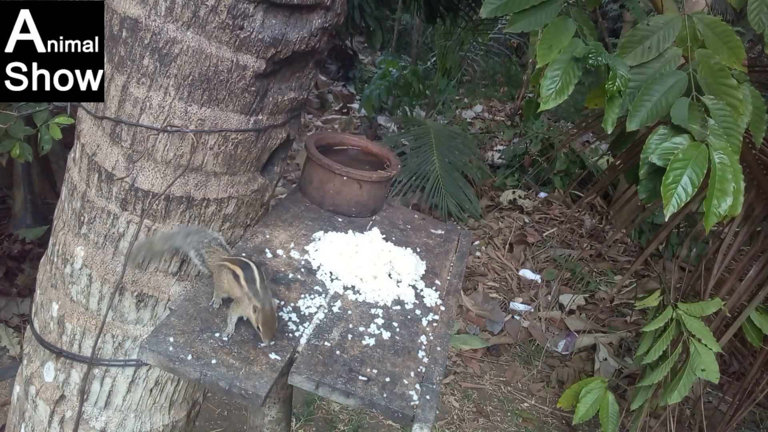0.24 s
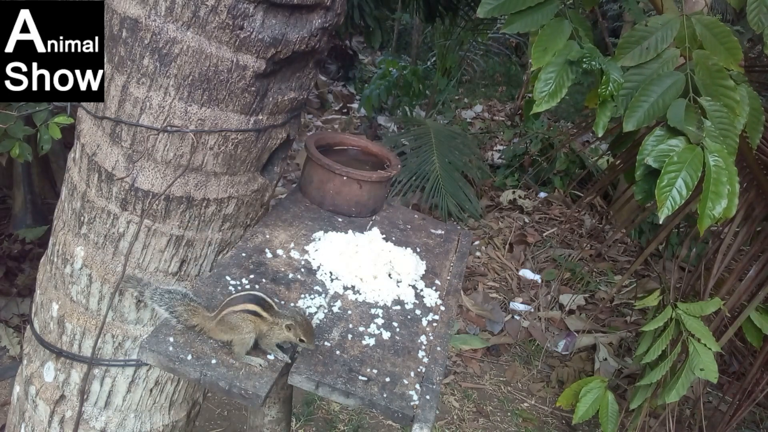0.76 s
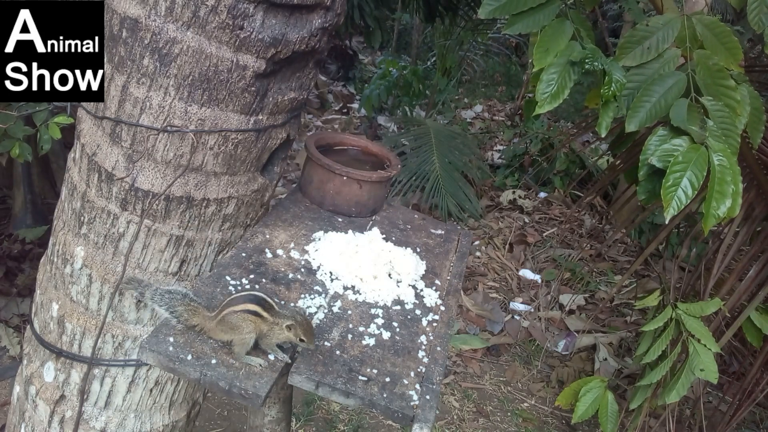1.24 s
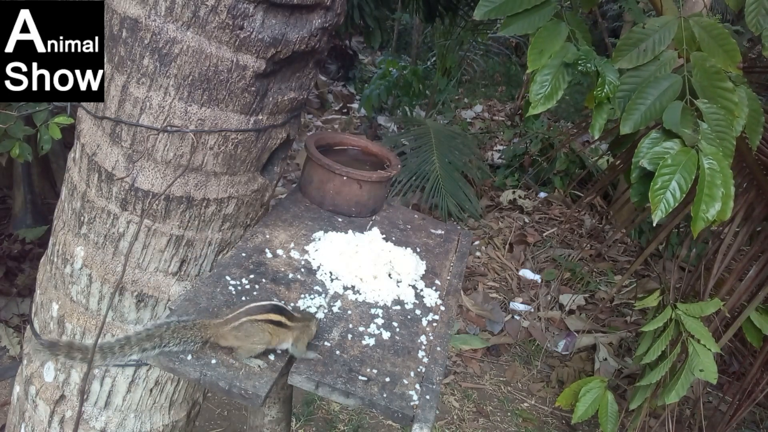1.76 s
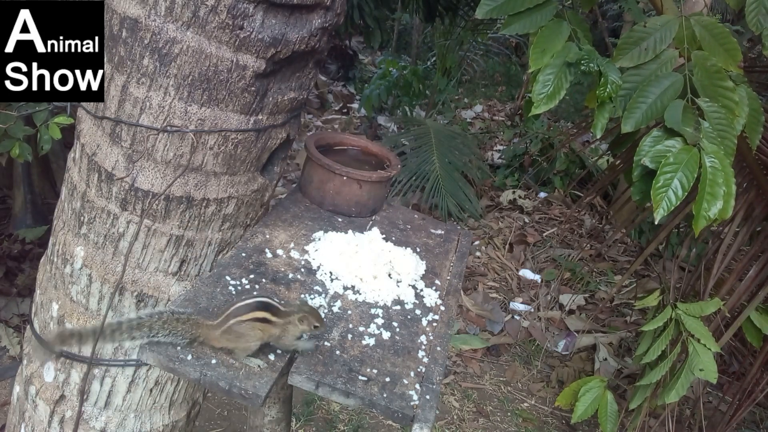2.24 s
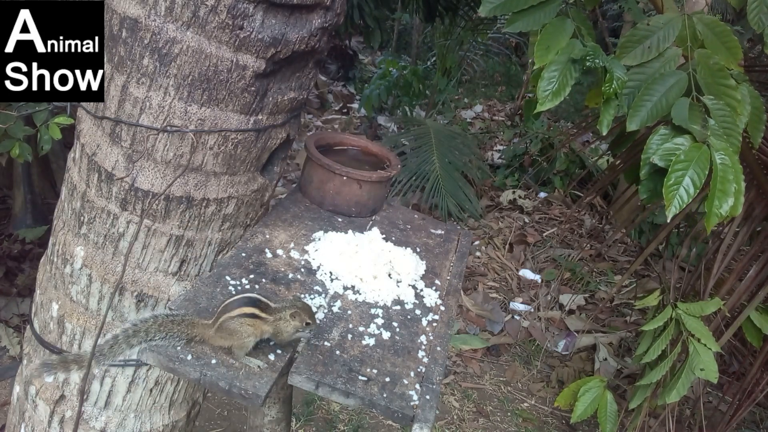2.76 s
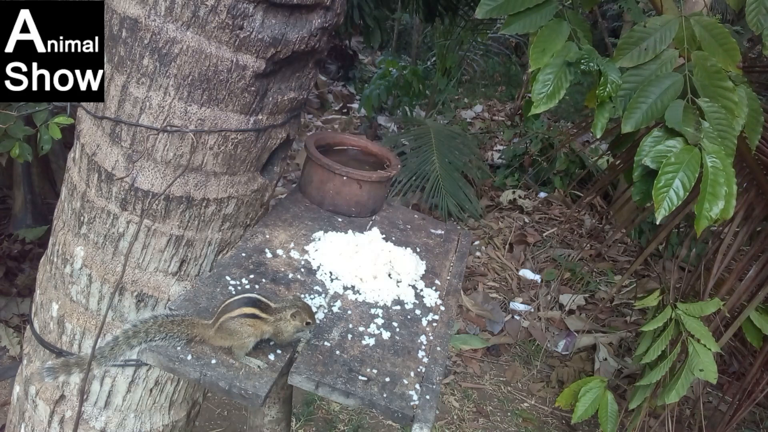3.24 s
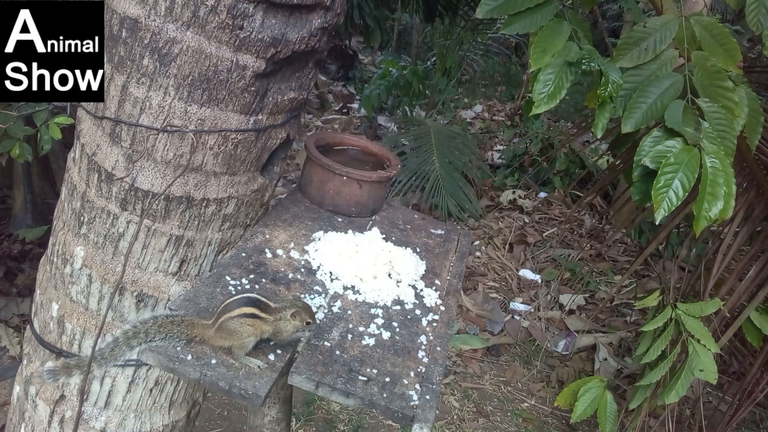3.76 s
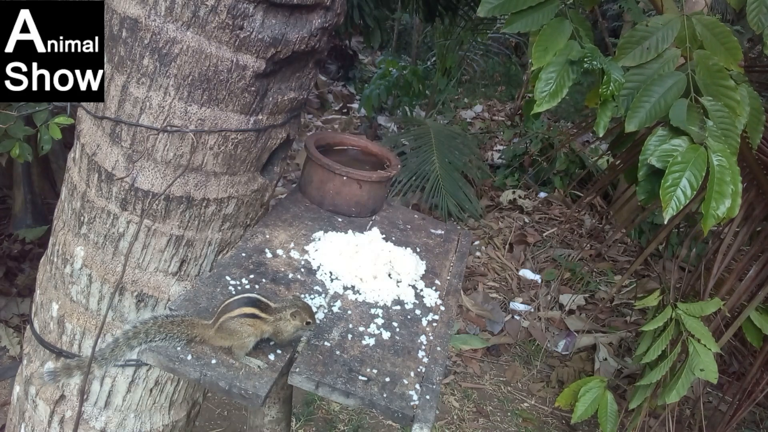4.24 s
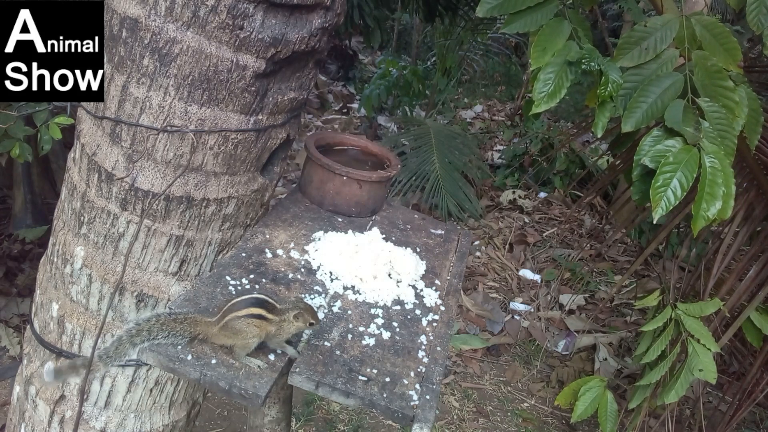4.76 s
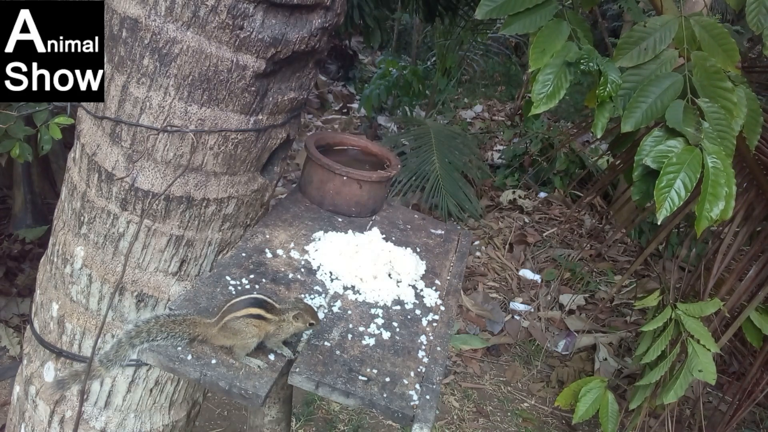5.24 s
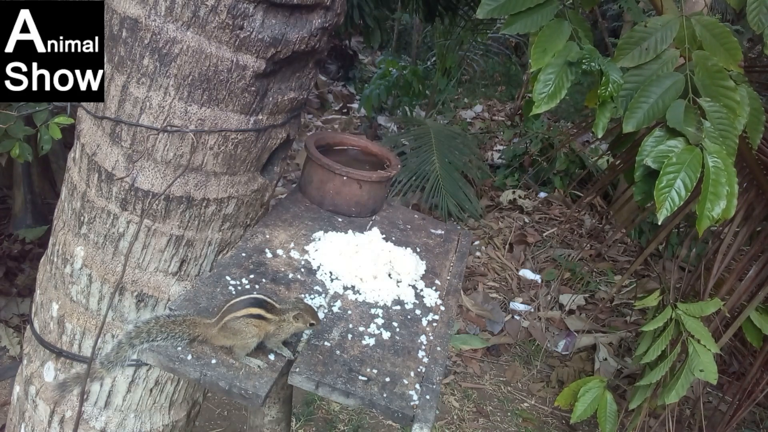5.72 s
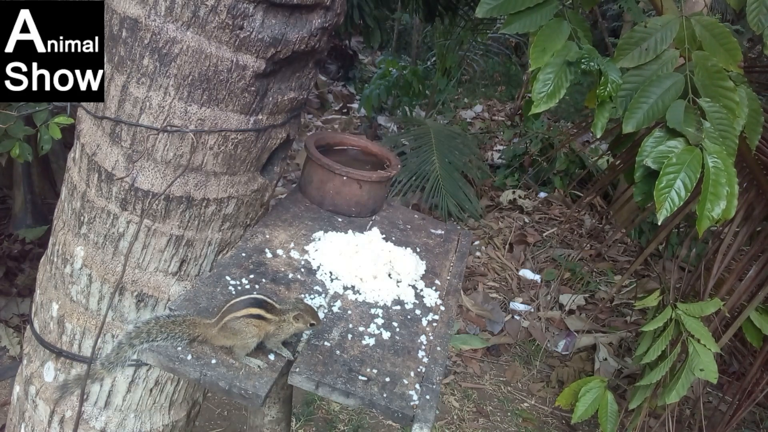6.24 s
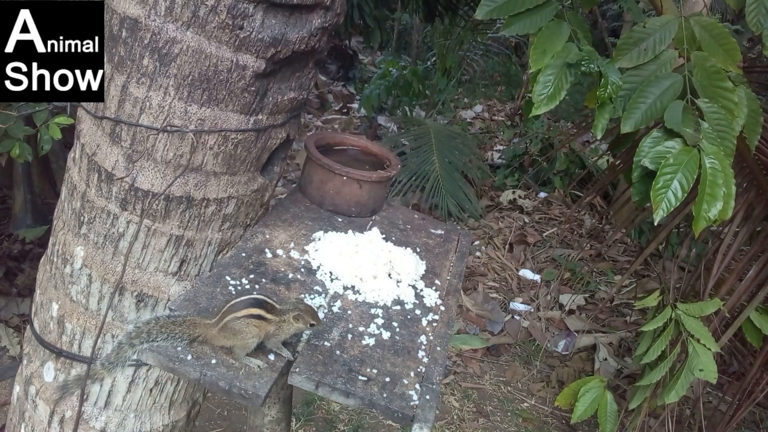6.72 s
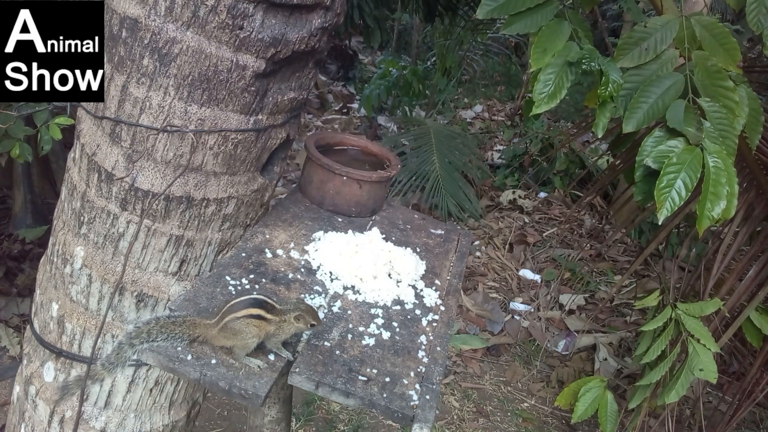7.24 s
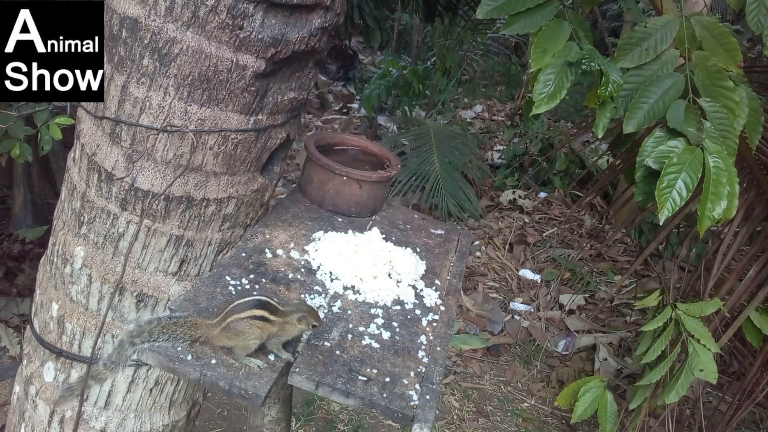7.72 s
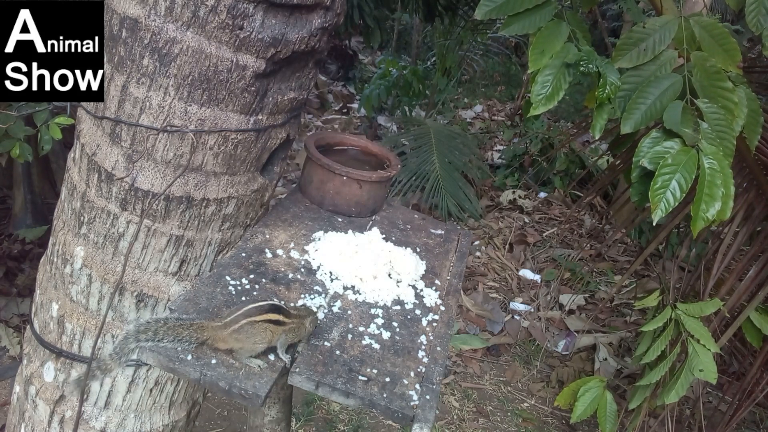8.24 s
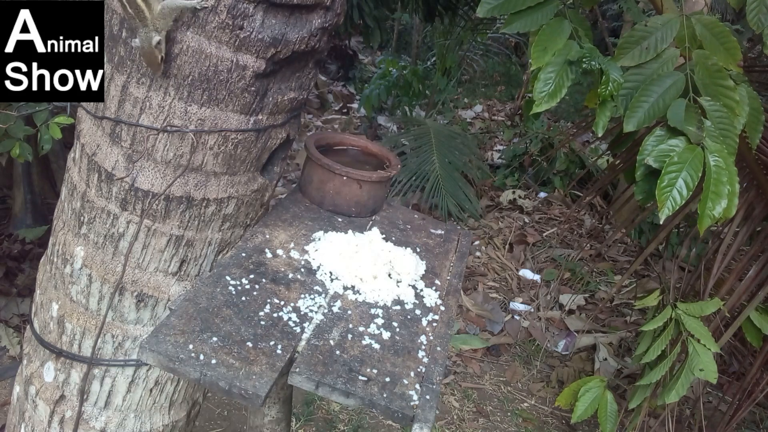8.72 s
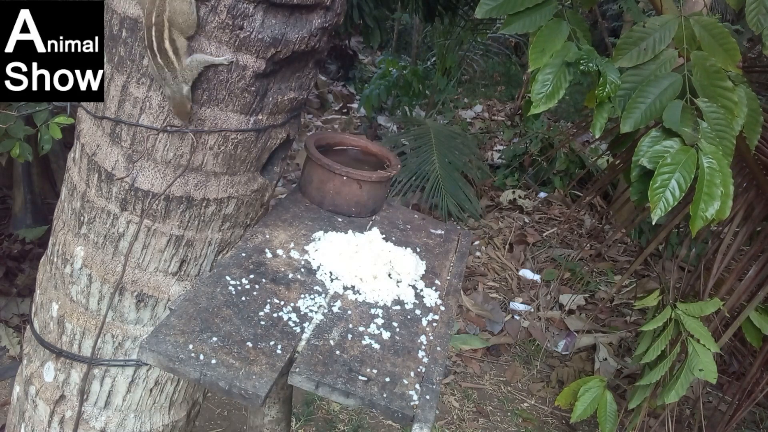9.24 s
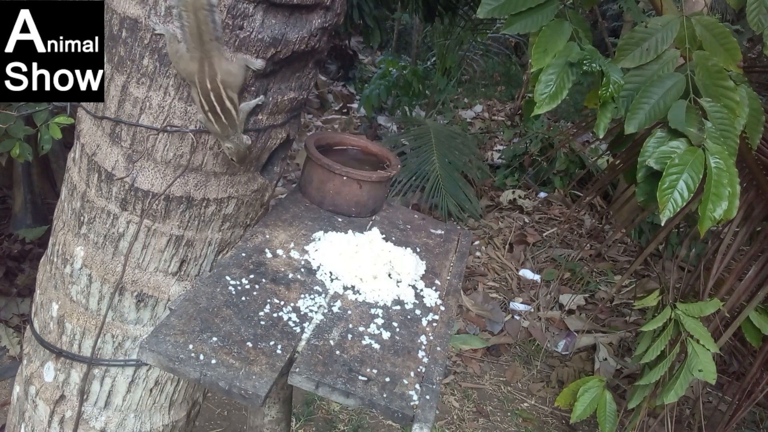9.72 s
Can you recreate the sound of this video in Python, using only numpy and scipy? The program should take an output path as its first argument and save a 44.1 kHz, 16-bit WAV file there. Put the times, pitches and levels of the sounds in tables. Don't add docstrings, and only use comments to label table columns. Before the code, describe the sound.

A small squirrel gives sharp, echoing high chirps in a garden while a sheet-metal gate rattles and bangs over faint birds and traffic rumble.

```python
import sys
import numpy as np
from scipy import signal
from scipy.fft import rfft, irfft, next_fast_len
from scipy.io import wavfile
from scipy.ndimage import uniform_filter1d, map_coordinates

SR = 44100
rng = np.random.default_rng(int(sys.argv[2]) if len(sys.argv) > 2 else 0)


def materialize(psi):
    bounded = np.clip(np.atleast_2d(psi).T, -1, 1)
    quanta = np.round(bounded * 32767).astype(np.int16)
    wavfile.write(sys.argv[1], SR, quanta)


def boost(x):
    u = np.asarray(x, float) / 20
    return 10 ** u


N = 440118

# [t/s, peak level/dB, held f/Hz, hold/s, strain/dB]
CHIRPS = [(0.079, -30.5, 2360, 0.015, 0.5), (0.259, -16.5, 2553, 0.026, -14),
          (3.991, -31, 2195, 0.017, -2.5), (4.317, -34.5, 2116, 0.0228, 0.5),
          (4.614, -18.5, 2590, 0.013, -12), (6.012, -30, 2554, 0.017, -8.5), (6.277, -20, 2548, 0.011, -8),
          (6.668, -26, 2600, 0.014, -3), (6.88, -20.5, 2555, 0.012, -6), (7.141, -22.5, 2584, 0.014, -2),
          (7.346, -29.5, 2493, 0.01, -0.5), (7.464, -29, 2518, 0.014, -0.5),
          (7.579, -25, 2484, 0.019, -2.5), (7.747, -26, 2512, 0.013, 0), (8.001, -29, 2484, 0.011, -0.5),
          (8.195, -35, 2442, 0.0094, 0), (8.397, -33, 2447, 0.01, -1.5)]
# [octave level/dB, closing slide level/dB, rasp level/dB, climb/share of pitch]
CHIRP_MOUTHS = [(-3, 0, -24, .12), (-2.5, 0, -32, .3), (2.5, -5, -9, .2), (4.5, -5, -8, 0.13),
                (1, 1.5, -25, .45), (2.5, -3, -19.5, 0.27), (4, -3.5, -21, .15), (0, -3.5, -20, 0.105),
                (-4, -0.5, -24, 0.134), (2, -2.5, -25, 0.139), (0, -1, -19, 0.096), (0, 0, -20, 0.099),
                (-3, 2, -20, 0.094), (-0.5, -2, -24, 0.097), (-2, -1, -21, 0.102), (-1, 1, -21.5, .1),
                (-1, 0.5, -22.5, 0.101)]
# [t/s, peak level/dB, held f/Hz, hold/s, strain/dB]
YELPS = [
    (6.383, -39, 2194, 0.017, -1.1),
    (6.533, -38.5, 2353, 0.0204, -1.2),
]
# [octave level/dB, closing slide level/dB, rasp level/dB, climb/share of pitch]
YELP_MOUTHS = [(-2, -2, -9.5, 0.102), (0.5, -1.8, -10, 0.101)]
# [t/s, level/dB, f/Hz, length/s, glide/share of pitch]
SQUEAKS = [
    (0.245, -43, 2830, 0.013, 0.24),
    (3.972, -33.5, 2760, 0.02, 0.22),
    (4.315, -30, 2900, 0.015, 0.24),
    (4.6, -44, 2730, .012, 0.21),
    (6.0, -46, 2700, 0.009, 0.26),
    (6.26, -40, 2640, 0.014, 0.22),
    (3.997, -34.5, 3160, 0.0235, -0.118),
    (4.333, -34, 3070, 0.023, -0.146),
    (4.625, -39, 3030, .012, -.12),
]
# [f/Hz, level/dB]
THROAT = [(1500, -35), (2100, 8.5), (2600, 1.5), (4200, -9.5), (5100, -6), (6200, 0), (7600, -11.5),
          (10000, -22), (12600, -9), (15500, -32)]
# [f/Hz, level/dB per Hz]
THROAT_AIR = [(1200, -40), (2000, 0), (3200, -6), (5500, 0.5), (7500, -8.5), (10000, -13.5), (13500, -6),
              (15700, -11.5)]

# [t/s, rms level/dB, decay stretch/ratio, brightening/dB per octave, up to f/Hz]
GATE_BLOWS = [(4.015, -47, 1.2, 10, 298), (4.116, -51, 0.8, 6.5, 3140), (4.154, -43.5, 1.9, 5.5, 2730),
              (4.218, -37.5, 0.83, 4.5, 625), (4.225, -42, 0.46, 3, 11100), (4.857, -39.5, 1.23, 5.5, 9000),
              (4.86, -59, 1, 6, 8900), (4.868, -28.5, 1.7, 1.5, 274), (4.95, -33, 3, 0.4, 1030),
              (5.427, -29, 0.56, 2, 1200), (5.427, -53, 0.26, 12, 15000), (5.438, -47, 0.55, 14.5, 9100),
              (5.446, -42.5, 0.82, 6, 7500), (5.47, -31.5, 0.89, 3, 5030)]
# [f/Hz, level/dB per Hz]
BLOW_SPECTRUM = [(25, -60), (40, -37), (65, -10), (100, -9), (168, -15), (270, -14.5), (330, -24),
                 (800, -26.5), (1500, -36.5), (3800, -45), (8000, -59), (15500, -75)]
# [f/Hz, width/Hz, level/dB]
PANEL_MODES = [(63.8, 4.3, 4), (94, 18, 3), (122, 13, 6.5), (213, 20, 4.5), (269, 12.6, 7), (413, 16, 7.5),
               (490, 20, 5), (653, 16, 6), (802, 10.5, 12), (1052, 24, 7.5)]
# [f/Hz, t60/s]
PANEL_DECAY = [(60, 2.05), (120, 0.76), (250, 0.88), (1000, 0.8), (4000, 0.61), (12000, 0.97)]
# [f/Hz, level/dB, t60/s]
BOLT_MODES = [(2419, -3, .52), (3962, -3, .23), (4775, 0, 0.26), (5163, 4, .3), (5771, -3, 0.55),
              (6800, 4.5, 0.63), (7460, 2, 0.56), (7610, 0, 0.35), (9800, 9, 0.12), (11050, 5, .2),
              (12480, -1, 0.43), (13010, 1, .25), (13300, -6, .3), (15400, -6, .2)]
HASP_MODES = [(1290, 3.5, 0.38), (2900, 0, 0.59), (5300, -5, .35), (7400, -11, .3)]
LATCH_MODES = [(2900, -3, .007), (3400, -3, .008), (3850, -2, .01), (4500, -8, .006), (5700, -4, .01),
               (6800, -9, .006), (8800, -12, .006), (13600, -19, .005)]
# [t/s, level/dB]
BOLT_STRIKES = [
    (5.436, -49.5),
    (5.448, -53),
    (5.47, -51.5),
]
HASP_JUMPS = [
    (4.118, -57),
    (4.156, -53),
    (4.22, -56),
]
LATCH_CLICKS = [
    (4.8578, -24.5),
    (4.8612, -38),
]

# [t/s, peak level/dB, f/Hz]
SNAPS = [(0.1996, -26.5, 2550), (.305, -39, 750), (2.518, -44.5, 2630), (2.715, -43, 1160),
         (3.462, -45.5, 550), (3.584, -43.5, 690), (4.2203, -21, 625), (5.432, -25, 500),
         (6.31, -37.5, 810), (6.44, -37, 840), (6.833, -32.5, 1530), (6.867, -34, 1500),
         (6.95, -29.5, 1800), (7.525, -40, 755), (7.63, -41, 750), (9.256, -45, 1510),
         (9.33, -37, 1280), (9.409, -36.5, 1610), (9.428, -43, 2130)]
# [f/Hz, level/dB per Hz]
LEAF_SPECTRA = [
    [(1180, -49), (2000, -17), (2290, -7.5), (2870, -13), (3460, -8), (7480, -10.5), (15500, -18)],
    [(530, -23), (900, -3.5), (2100, 0.5), (2510, 5), (3300, -11.5), (7060, 1), (15500, -16.5)],
]
LEAF_SWEEPS = [
    (1.094, -76, .15, .1),
    (1.49, -72, .06, .12),
    (2.94, -72, .04, .6),
    (3.03, -76, .4, .15),
    (3.158, -70, .15, .15),
    (3.296, -79, .03, .05),
]
LEAF_SCUFFLES = [
    (6.846, -55, 0.11, 0.092),
    (6.9, -57.5, 0.044, 0.31),
    (7.006, -74, 0.038, 0.71),
    (8.606, -71, 0.054, .04),
    (8.723, -66, 0.019, 0.22),
    (8.969, -89, 0.27, .08),
    (9.2, -93, 0.008, 0.017),
    (9.338, -61, .2, 0.1),
    (9.428, -67, 0.053, 0.041),
]

# [t/s, length/s, from f/Hz, to f/Hz, level/dB]
BIRD_NOTES = [(0.528, 0.098, 2020, 2185, -69), (0.597, 0.048, 2530, 2225, -63.5),
              (0.637, 0.087, 2400, 2540, -71), (1.562, 0.21, 2047, 2140, -71.5),
              (1.741, 0.18, 2130, 2400, -66), (1.87, 0.1, 2290, 2067, -66), (2.659, 0.27, 1935, 2437, -70),
              (2.92, 0.066, 2380, 2120, -69), (8.6, 0.19, 2527, 2440, -67.5),
              (8.69, .11, 2290, 2135, -68.5), (9.619, 0.24, 1850, 2114, -76),
              (9.846, 0.18, 2324, 2530, -68.5), (3.588, 0.11, 2350, 2470, -75),
              (8.84, 0.11, 2900, 2830, -72.5), (2.0, 0.43, 2150, 2240, -81.5),
              (9.24, 0.13, 2520, 2220, -70)]
# [t/s, length/s, from f/Hz, to f/Hz, level/dB]
THIN_WHISTLES = [(2.06, .2, 4900, 4780, -77), (9.41, .13, 4750, 4550, -76), (3.49, .075, 4400, 4850, -70),
                 (3.56, .3, 4850, 4800, -78), (3.6, .04, 4800, 3600, -65), (3.8, .09, 6300, 4950, -73),
                 (1.56, .22, 4100, 4300, -75), (1.75, .15, 4800, 4850, -76), (1.9, .07, 4350, 4100, -72),
                 (2.58, .27, 3760, 4400, -73), (1.25, .13, 3400, 3350, -76), (9.62, .25, 3750, 4200, -75),
                 (.47, .11, 4250, 4250, -75), (3.83, .14, 3620, 3820, -78), (1.76, .1, 2700, 2680, -75)]
MOTOR_SWELLS = [
    (1.53, -58.5, .65, 0.56),
    (2.0, -61.5, 0.2, 0.38),
    (2.62, -56.5, 0.19, 0.62),
    (3.22, -63, 0.17, 0.062),
]

TRAFFIC_SWELLS = [
    (.41, -62, 1, 0.78),
    (1.3, -64, 0.32, 3.3),
    (2.41, -61, 3.2, 0.32),
    (3.28, -60, 0.73, 0.73),
    (3.95, -64, 2, 3.5),
    (6.42, -49, 0.15, 0.27),
    (7.7, -73, 2, 2.3),
    (8.9, -53, 0.65, 2),
    (9.6, -59, 1.8, 6.4),
]
DRONE_SWELLS = [
    (.41, -61, 1.9, .6),
    (1.4, -58, 0.89, 6),
    (2.66, -74, 0.43, 3.3),
    (3.25, -76, 1.4, 0.074),
    (3.95, -66, 0.44, 3.9),
    (6.42, -63, 1.4, 0.28),
    (7.05, -67, 1.1, 0.3),
    (7.55, -54, 0.24, 0.34),
    (8.32, -60, 1.9, 0.98),
    (9.14, -59, 0.72, 3.6),
]
# [f/Hz, level/dB per Hz]
TRAFFIC_SPECTRUM = [(25, -18), (42, 0), (65, 6.5), (100, -9.5), (160, -10), (300, -60)]
DRONE_SPECTRUM = [(400, -18.5), (560, -2.5), (670, -0.5), (760, -2.5), (950, -29)]
INSECT_SPECTRUM = [(5400, -35), (6200, -6.5), (6900, 2.5), (7400, -5), (8000, -27)]
GARDEN_SPECTRUM = [(15, -45), (25, -7), (64, -0.5), (126, -6.5), (178, -12), (275, -8), (446, -14),
                   (668, -14.5), (1180, -21), (1580, -22.5), (2860, -25.5), (3450, -25.5), (3840, -28),
                   (6950, -31), (15600, -46)]
# [t/s, level/dB]
GARDEN_LEVEL = [
    (0, -71.5),
    (3.4, -74),
    (4, -69.5),
    (6.4, -66),
    (8, -67.5),
    (8.8, -69.5),
    (9.98, -69.5),
]

# [delay t/s, level/dB]
WALL_ECHOES = [(0, -30), (.003, -2), (.012, 1), (.03, 1), (.05, -2), (.08, -5), (.11, -6), (1, -6)]
# [f/Hz, t60/s]
YARD_DECAY = [(1500, 0.53), (2500, 0.83), (5000, 0.81), (8000, 0.48), (14000, 0.52)]

ECHO_DB, ECHO_PER_DB, CLIMB_DB_PER_S, YELP_ECHO_DB = -5, -0.3441, 1.563, -3
CLIMB_S = .012
ECHO_SAMPLES = 2 * SR // 3


def squirrel():
    out = np.zeros(N)
    for (s, db, hz, hold, strain_db), mouth in zip(CHIRPS, CHIRP_MOUTHS):
        hoarse = .07 + np.clip((2400 - hz) / 1000, 0, 1)
        fall = np.clip(1.6 * (1 - 2000 / hz), .05, .3)
        arch = max(0.0417 + 0.00323 * strain_db, 0)
        call = chirp(hz, hold, strain_db, call_echo_db(s, db), arch, hoarse, fall, mouth)
        add(out, s - CLIMB_S, boost(db - 7.0) * call)
    for (s, db, hz, hold, strain_db), mouth in zip(YELPS, YELP_MOUTHS):
        echo_db = call_echo_db(s, db) + YELP_ECHO_DB
        call = chirp(hz, hold, strain_db, echo_db, arch=.05, hoarse=.4, fall=.18, mouth=mouth)
        add(out, s - CLIMB_S, boost(db - 2.5) * call)
    for s, db, hz, length, glide in SQUEAKS:
        add(out, s, boost(db) * yard(squeak(hz, length, glide), wet_db=-9))
    add(out, 0, earlier_calls())
    return out


def call_echo_db(s, db):
    return ECHO_DB + ECHO_PER_DB * (db + 33.0) + CLIMB_DB_PER_S * s


def chirp(hz, hold, strain_db, echo_db, arch, hoarse, fall, mouth):
    octave_db, slide_db, rasp_db, rise = mouth
    step, drop = .012, .016
    slide = hold + step
    end = slide + drop
    t = np.arange(round((CLIMB_S + end) * SR)) / SR - CLIMB_S

    pitch_times = [-CLIMB_S, 0, .5 * hold, hold, hold + 0.00442, slide, end]
    pitch_shape = [1 - rise - arch, 1 - arch, 1.002, 1.006 - .5 * arch,
                   1 - 0.359 * fall, 1 - .55 * fall, 1 - fall]
    pitch = hz * np.interp(t, pitch_times, pitch_shape)
    rough = np.interp(t, [hold, slide - .003, slide + .003], [hoarse, hoarse + .1, .4])
    pitch = pitch * (1 + .022 * rough * wobble(500, len(t)))

    tail_db = -14.0 + 1.54 * strain_db + slide_db
    level_times = [-CLIMB_S, -.007, -.001, .002, 0.37 * hold, hold - .002, hold + 0.0012, end - .005, end]
    level_db = np.interp(t, level_times, [-36, -22, -15, -3, 0, -3, tail_db, tail_db - .5, -40])
    level_db += 5 * rough * wobble(700, len(t))

    open_db = np.interp(t, [-.002, .001, hold, hold + .004], [-22, 0, 0, 8])
    facing = np.interp(t, [hold, hold + .004], [1, .4])
    rasp = unit(coloured(rng.standard_normal(len(t)), THROAT_AIR))
    rasp *= np.interp(t, [-CLIMB_S, -.008, hold, end], [0, 0.85, 0.52, 0])
    tone = boost(level_db) * voice(pitch, strain_db, open_db, octave_db)
    return yard(tone + boost(rasp_db) * rasp, echo_db, facing)


def voice(pitch, strain_db, open_db=0, octave_db=0, count=7):
    k = np.arange(1, count + 1)[:, None]
    shift_db = strain_db * (k > 2) + octave_db * (k == 2) + open_db * (k > 1)
    gain = boost(along(THROAT, k * pitch) + shift_db) * (k * pitch < SR / 2.6)
    phase = 2 * np.pi * k * np.cumsum(pitch) / SR + k * k
    return np.sum(gain * np.sin(phase), axis=0)


def squeak(hz, length, glide):
    u = np.linspace(0, 1, round(length * SR))
    pitch = hz * (1 + glide * (u - .5) + .04 * wobble(700, len(u)))
    phase = 2 * np.pi * np.cumsum(pitch) / SR
    tone = 0.37 * (glide > 0) * np.sin(phase) + np.sin(2 * phase) + 0.16 * np.sin(4 * phase)
    return np.sin(np.pi * u) * tone * boost(3 * wobble(600, len(u)))


def earlier_calls():
    t = np.arange(SR // 4) / SR
    fading = boost(-62 - 40 * t + 5 * wobble(100, len(t)))
    waver_hz = 25 * wobble(250, len(t))
    low = voice(2300 + waver_hz, -18, -3)
    high = voice(2590 - waver_hz, -30, 4)
    return fading * (low + boost(-6 - 60 * t) * high)


def metal_gate():
    out = np.zeros(N)
    for s, db, stretch, tilt_db, knee_hz in GATE_BLOWS:
        add(out, s, boost(db) * panel_blow(stretch, tilt_db, knee_hz))
    for strikes, modes, attack_s, beat_db in ((BOLT_STRIKES, BOLT_MODES, .003, 3),
                                              (HASP_JUMPS, HASP_MODES, .002, 5),
                                              (LATCH_CLICKS, LATCH_MODES, .0006, 1.5)):
        for s, strike_db in strikes:
            add(out, s, boost(strike_db) * steel(modes, attack_s, beat_db))
    return out


def panel_blow(stretch, tilt_db, knee_hz):
    t = np.arange(3 * SR // 2) / SR

    def colour(hz):
        panel = 1.45 + sum(boost(db) / (1 + (2 * (hz - c) / w) ** 2) for c, w, db in PANEL_MODES)
        brighter_db = tilt_db * np.log2(np.clip(hz, 40, knee_hz) / 200)
        duller_db = 3.4 * np.log2(np.clip(hz / knee_hz, 1, 8))
        return boost(along(BLOW_SPECTRUM, hz) + brighter_db - duller_db) * panel

    shake = filtered(dying(PANEL_DECAY, stretch, len(t)), colour)
    shake = shake / np.std(shake[:SR // 10])
    return (1 - np.exp(-t / .004)) * boost(1.4 * wobble(45, len(t))) * shake


def steel(modes, attack_s, beat_db):
    t = np.arange(2 * SR // 3) / SR
    ring = np.zeros(len(t))
    for hz, db, t60 in modes:
        level_db = db - 60 * t / t60 + beat_db * wobble(57, len(t))
        ring += boost(level_db) * np.sin(2 * np.pi * hz * t + 0.5 * wobble(93, len(t)))
    return (1 - np.exp(-t / attack_s)) * ring


def snaps():
    out, t = np.zeros(N), np.arange(SR // 20) / SR
    for s, db, hz in SNAPS:
        ring = boost(-9 * t * hz) * np.sin(2 * np.pi * hz * t)
        crack = boost(-60 * t / 0.002) * rng.standard_normal(len(t))
        snap = filtered(ring + crack, lambda f: 1 / (1 + (f / (3 * hz)) ** 2))
        add(out, s, boost(db) * yard(snap, wet_db=-5))
    return out


def leaves():
    out = np.zeros(N)
    for spectrum, spells, crackly, lumpy_db in ((LEAF_SPECTRA[0], LEAF_SWEEPS, .15, 1.5),
                                                (LEAF_SPECTRA[1], LEAF_SCUFFLES, .45, 3.2)):
        crackle = (rng.random(N) < .012 * boost(7 * wobble(45))) * rng.standard_normal(N)
        brush = rng.standard_normal(N) * boost(lumpy_db * wobble(60))
        rustle = unit(coloured(unit(crackle) * crackly + brush, spectrum))
        out += rustle * boost(7.0) * swells(spells)
    return out


def birds():
    out = np.zeros(N)
    for s, length, from_hz, to_hz, db in BIRD_NOTES + THIN_WHISTLES:
        waver, flutter = wobble(120, SR // 2), wobble(25, SR // 2)
        u = np.arange(SR // 2) / SR / length
        pitch = (from_hz + (to_hz - from_hz) * u) * (1 + .013 * waver)
        phase = 2 * np.pi * np.cumsum(pitch) / SR
        shape = np.clip(np.minimum(u / 0.16, (1 - u) / 0.069), 0, 1)
        add(out, s, shape * boost(db + 3.2 * flutter) * np.sin(phase))
    return boost(1.5) * yard(out, wet_db=1, facing=.5)[:N]


def motor():
    pitch = 666 * (1 + 0.0176 * wobble(3) + 0.0261 * wobble(30))
    phase = 2 * np.pi * np.cumsum(pitch) / SR
    return swells(MOTOR_SWELLS) * boost(-3.0 + 1.7 * wobble(23)) * np.sin(phase)


def traffic():
    return swells(TRAFFIC_SWELLS) * boost(-9.0 + 2.9 * wobble(5.5)) * hiss(TRAFFIC_SPECTRUM, patchy_db=2.5)


def far_drone():
    return swells(DRONE_SWELLS) * boost(-7.5 + 0.63 * wobble(3.4)) * hiss(DRONE_SPECTRUM, patchy_db=1.0)


def insects():
    return boost(-71.5) * hiss(INSECT_SPECTRUM, patchy_db=.3)


def garden_hiss():
    level_db = np.interp(np.arange(N) / SR, *np.transpose(GARDEN_LEVEL))
    return boost(level_db + 11) * hiss(GARDEN_SPECTRUM, patchy_db=2.5)


def yard(x, wet_db, facing=1):
    direct = filtered(facing * x, lambda hz: 1 / (1 + (hz / 8000) ** 2))
    return echoes(x, wet_db) + np.pad(direct, (0, ECHO_SAMPLES - 1))


def echoes(x, wet_db):
    delay, density_db = np.transpose(WALL_ECHOES)
    level_db = np.interp(np.arange(ECHO_SAMPLES) / SR, delay, density_db)
    level_db += 1.5 * wobble(90, ECHO_SAMPLES)
    tail = dying(YARD_DECAY, 0.66, ECHO_SAMPLES) * boost(level_db)
    return signal.fftconvolve(x, boost(wet_db) * tail / np.linalg.norm(tail))


def swells(rows):
    t = np.arange(0, N / SR + .001, .001)
    gain = np.zeros(len(t))
    for s, db, rise, fall in rows:
        away = np.maximum((s - t) / max(rise, 1e-3), (t - s) / max(fall, 1e-3))
        gain += boost(db - 20 * away)
    return np.interp(np.arange(N) / SR, t, gain)


def hiss(spectrum, patchy_db):
    z = signal.stft(rng.standard_normal(N + 512), nperseg=512)[2]
    field = uniform_filter1d(rng.standard_normal(z.shape), 6, 0)
    field = uniform_filter1d(field, 14, 1)
    patchy = signal.istft(z * boost(patchy_db * unit(field)), nperseg=512)[1][:N]
    return unit(coloured(patchy, spectrum))


def dying(t60s, stretch, count):
    hz, t, z = signal.stft(rng.standard_normal(count), SR, nperseg=512)
    t60 = stretch * along(t60s, hz)[:, None]
    return signal.istft(z * boost(-60 * t / t60), SR, nperseg=512)[1][:count]


def wobble(rate, n=N):
    knots = rng.standard_normal(int(n * rate / SR) + 4)
    return map_coordinates(knots, [np.arange(n) * rate / SR])


def filtered(x, response):
    m = next_fast_len(len(x) + 8192)
    return irfft(rfft(x, m) * response(np.fft.rfftfreq(m, 1 / SR)), m)[:len(x)]


def coloured(x, spectrum):
    return filtered(x, lambda hz: boost(along(spectrum, hz)))


def along(points, hz):
    f, v = np.transpose(points)
    return np.interp(np.log(hz + 1), np.log(f + 1), v)


def unit(x):
    return x / np.sqrt(np.mean(x ** 2) + 1e-20)


def add(track, s, x):
    part = track[max(round(s * SR), 0):][:len(x)]
    part += x[:len(part)]


def scene():
    near = squirrel() + metal_gate() + snaps() + leaves()
    far = birds() + motor() + traffic() + far_drone() + insects() + garden_hiss()
    return (near + far)[None]


def top_cut(x):
    return signal.sosfilt(signal.butter(12, 15730, fs=SR, output="sos"), x)


def record(dry):
    mix = filtered(dry[0], lambda hz: (hz < 15750) / (1 + (30 / (hz + 1)) ** 4))
    return top_cut(mix[None])


dry = scene()
out = record(dry)
materialize(out)
```